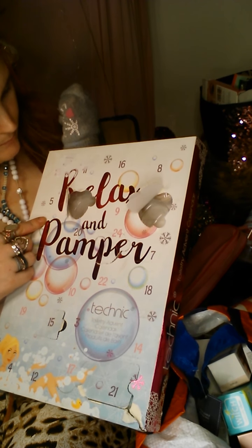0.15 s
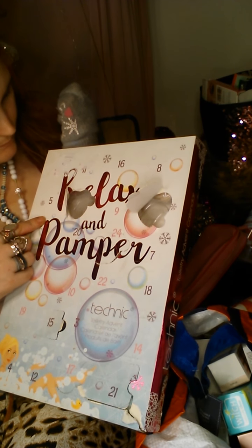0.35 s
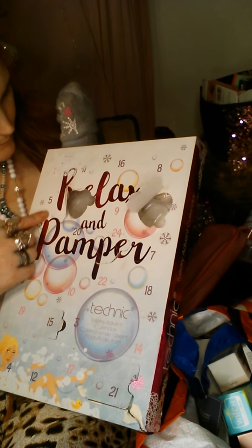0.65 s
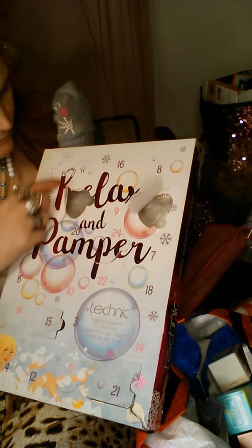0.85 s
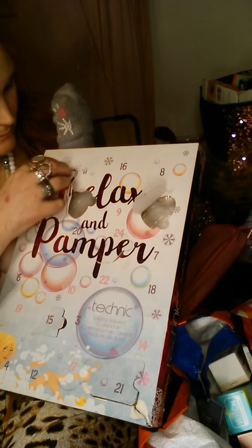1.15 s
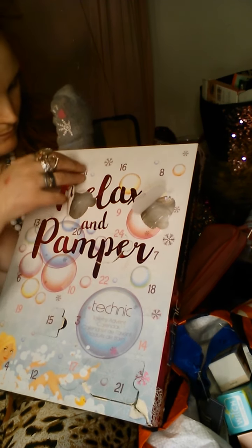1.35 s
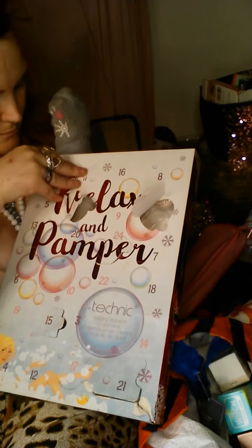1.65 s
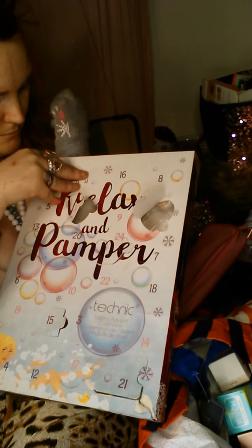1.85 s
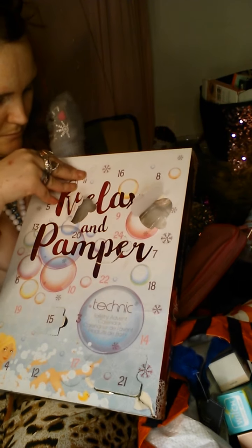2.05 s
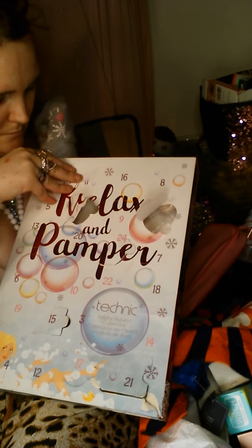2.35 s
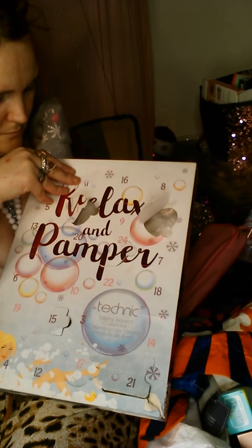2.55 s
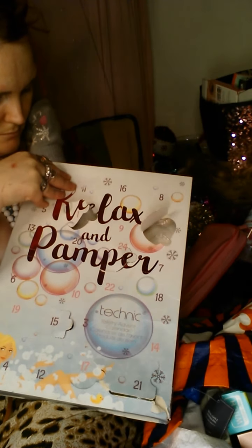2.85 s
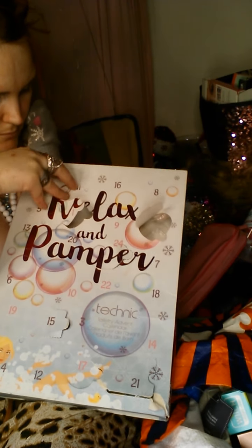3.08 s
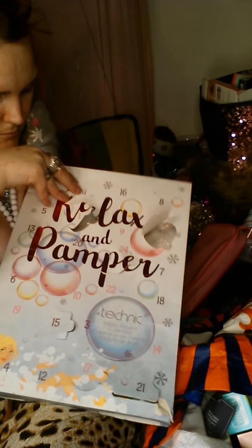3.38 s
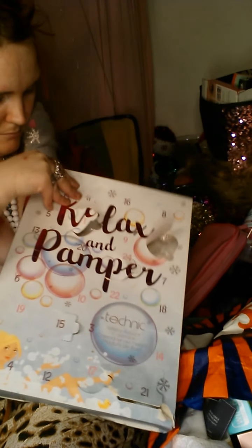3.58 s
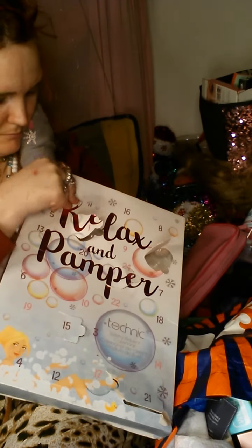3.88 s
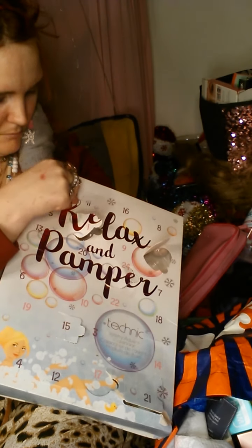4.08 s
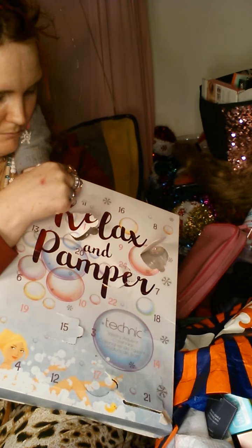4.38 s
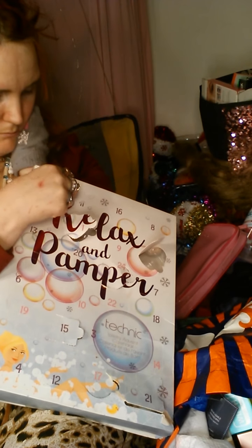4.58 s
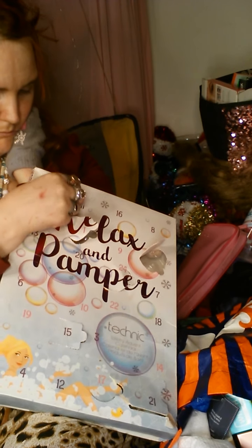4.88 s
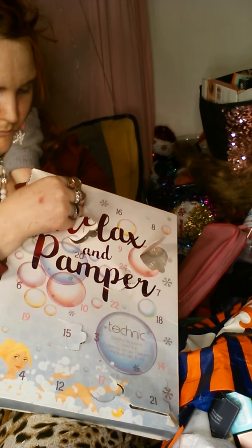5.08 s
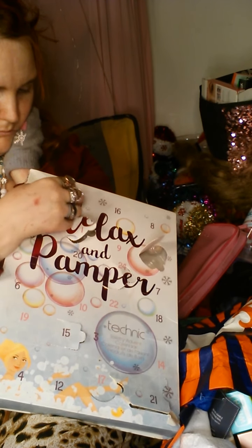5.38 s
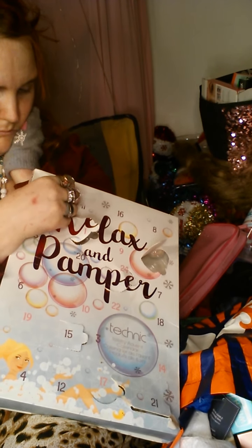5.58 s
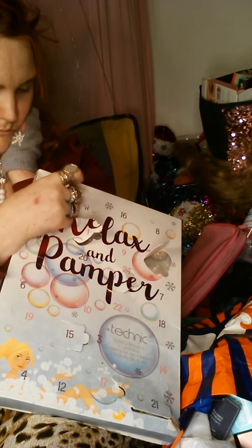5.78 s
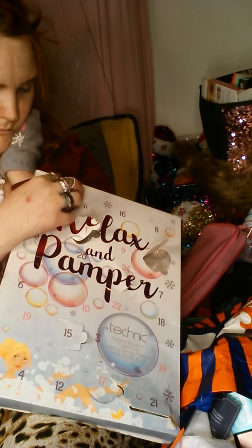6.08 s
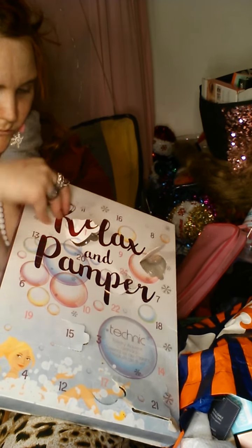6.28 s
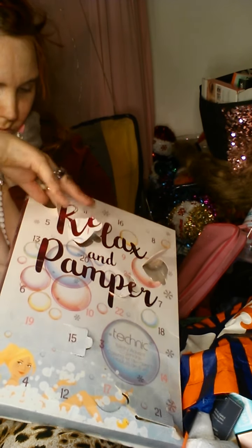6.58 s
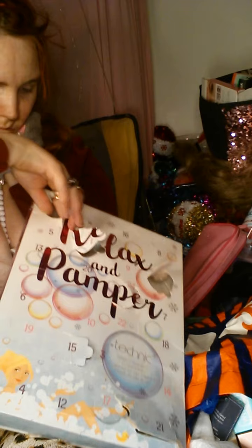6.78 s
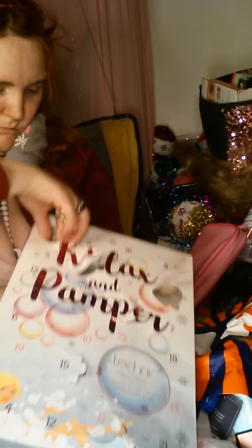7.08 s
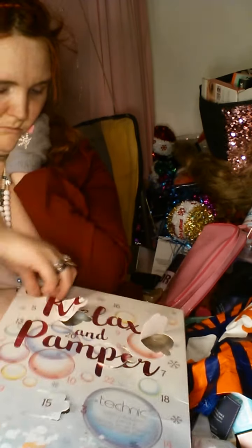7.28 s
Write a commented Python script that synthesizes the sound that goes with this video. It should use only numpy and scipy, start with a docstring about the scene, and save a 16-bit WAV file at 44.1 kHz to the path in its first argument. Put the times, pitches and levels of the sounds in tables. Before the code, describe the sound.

A quiet, small furnished room, captured very close by a phone, with faint low rumble and hiss. For about 0.7 seconds almost nothing is heard; then skin glides softly over glossy card, with dull fingertip bumps from 1.1 to 1.4. From 1.5 nails catch and the rubbing turns gritty. Snaps multiply from 1.9, with fibres tearing around 2.2 to 2.4 and a strong crack and rip at 2.5. More hollow knocks cluster near 2.8, then lighter rustling and ticks. Sharp cracks with a short rip hit at 3.75, another at 4.17. Activity thins from 4.5 to 6, broken by bright snaps at 5.1 and 5.2 amid soft scraping. From 6.5 the sliding grows louder and rougher, snaps crowd together around 7, a tearing run rises near 7.15, and heavy cracks, a rip and low box thumps crowd around 7.3 to 7.4.

```python
"""Stick-slip friction and fracture on a cardboard box

Fingers pry open a perforated door of a cardboard box calendar, close to a phone in a small furnished room.
Skin and sleeve slide over the card: filtered noise, first smooth, then broken into stick-slip catches.
Perforations, creases and fibres snap: brief noise bursts ring the card edge, the panel and the hollow box.
Padded knocks and creaks are bursts around a pitch each; decaying reflections and a faint hiss surround all.
"""
import sys
import numpy as np
from scipy import signal
from scipy.fft import rfft, irfft
from scipy.io import wavfile

SR = 44100
rng = np.random.default_rng(int(sys.argv[2]) if len(sys.argv) > 2 else 0)


def master_out(mix):
    """Clip the mix to full scale and print it as 16-bit PCM to the path in sys.argv[1]."""
    frames = np.transpose(np.atleast_2d(mix))
    ceiling = np.clip(frames, -1, 1)
    pcm = np.round(ceiling * 32767).astype(np.int16)
    wavfile.write(sys.argv[1], SR, pcm)


N = 328104
TIME = np.arange(N) / SR

# Event levels below are taken before the gains of each source, the room and the two ports.
# Strokes of skin, nail or sleeve along the card: start_s, length_s, surface_hiss_db, panel_scrape_db
STROKES = [(0.068, 0.12, -86, -82.5), (0.758, 0.28, -57, -72), (0.84, .18, -51.5, -63.5),
           (1.186, 0.11, -48, -55), (1.37, 0.02, -38.5, -49), (1.478, 0.016, -48.5, -53.5),
           (1.714, 0.029, -44, -47), (1.82, 0.12, -48.5, -50.5), (2.005, 0.029, -42, -47),
           (2.134, 0.14, -45.5, -47), (2.331, 0.12, -45, -40.5), (2.727, 0.14, -43, -48.5),
           (2.951, 0.02, -42.5, -48), (3.058, 0.16, -47, -48.5), (3.403, 0.1, -43.5, -46),
           (3.455, .025, -39, -54), (3.556, 0.17, -56.5, -49.5), (3.687, 0.053, -37, -36),
           (3.958, 0.089, -36.5, -46.5), (4.082, 0.16, -44, -74), (4.293, 0.054, -39.5, -57),
           (4.488, 0.023, -42.5, -52), (4.779, 0.061, -44, -50), (5.026, 0.29, -50.5, -52.5),
           (5.498, 0.02, -54, -60), (5.642, 0.06, -49, -54), (5.692, 0.038, -44.5, -51.5),
           (5.791, 0.029, -44.5, -60), (5.887, 0.022, -49.5, -52.5), (6.041, 0.012, -40.5, -49.5),
           (6.2, 0.3, -49, -55), (6.445, 0.016, -40, -51), (6.54, 0.44, -43, -44.5),
           (6.62, 0.018, -35.5, -36.5), (6.759, 0.14, -34, -47.5), (6.993, 0.47, -36, -43),
           (7.112, 0.085, -31, -42.5), (7.237, 0.15, -36.5, -33.5)]
STROKE_ATTACK_S, STROKE_RELEASE_DB_PER_S = 0.012, 335
# Spells of resting fingers that never keep quite still: start_s, length_s
HOLDS = [(1.003, .42), (1.586, 1.1), (2.63, 0.5), (3.37, 1.23), (4.682, 1.17), (5.998, 1.6)]
HOLD_HISS_DB, HOLD_SCRAPE_DB = -55.5, -56
# Rips, where a stretch of card gives way at once: start_s, length_s, surface_hiss_db, panel_scrape_db
RIPS = [(1.628, 0.0058, -40.5, -38.5), (2.494, 0.016, -28.5, -34), (2.82, .02, -40, -51),
        (3.741, 0.052, -24, -35), (4.172, 0.009, -27.5, -48), (5.204, 0.027, -42, -64),
        (5.42, 0.005, -44.5, -64), (6.228, 0.0076, -36, -62), (7.305, 0.038, -23.5, -29)]
RIP_ATTACK_S, RIP_RELEASE_DB_PER_S = 0.0013, 435
# Bumps and creaks of fingertips on the card and shifts of the box: start_s, level_db, pitch_hz, swell_s
NUDGES = [(0.57, -80, 900, .003), (1.085, -62, 1070, 0.0036), (1.147, -51, 645, 0.0028),
          (1.222, -45.5, 1210, 0.0033), (1.284, -42, 1210, 0.0049), (1.333, -40.5, 1090, 0.007),
          (2.116, -43, 660, 0.0054), (2.64, -41.5, 950, 0.0053), (2.825, -23.5, 1740, 0.001),
          (2.87, -37, 175, 0.0037), (3.01, -47, 666, 0.0036), (3.162, -38.5, 720, 0.0036),
          (3.186, -40, 670, 0.0042), (3.526, -44, 507, 0.011), (3.671, -41, 533, .0025),
          (3.762, -39.5, 150, 0.0075), (3.863, -47, 620, .002), (3.946, -47, 145, 0.0027),
          (4.17, -24.5, 2430, 0.0012), (4.171, -34.5, 427, 0.0021), (5.156, -47, 487, .004),
          (5.246, -50, 400, 0.003), (5.336, -45.5, 517, 0.0045), (5.901, -48.5, 650, 0.0029),
          (6.628, -35.5, 154, 0.0065), (6.638, -33.5, 374, 0.0028), (6.872, -46, 260, 0.012),
          (7.30, -34, 137, 0.0025), (7.355, -34, 163, 0.0024)]
# Snaps of perforations and creases: start_s, edge_tick_db, panel_knock_db
CRACKS = [ (1.542, -49.5, -46.5), (1.629, -38, -38), (1.843, -39.5, -46.5), (1.877, -40, -36.5),
          (1.91, -36.5, -42.5), (1.964, -32, -33.5), (2.09, -39.5, -35.5), (2.151, -31, -41),
          (2.198, -39, -59), (2.217, -28.5, -51), (2.261, -43, -40), (2.324, -33.5, -32.5),
          (2.339, -26, -44), (2.39, -26.5, -31), (2.415, -41, -38.5), (2.492, -18, -19.5),
          (2.734, -37.5, -26), (2.775, -40, -33.5), (2.79, -36, -35), (2.816, -27.5, -23.5),
          (2.826, -27.5, -24.5), (2.941, -40, -51), (3.098, -36, -42.5), (3.214, -40, -39.5),
          (3.319, -50, -41), (3.341, -37.5, -47), (3.375, -28, -33.5), (3.435, -37, -44.5),
          (3.485, -42, -31.5), (3.737, -18, -21.5), (3.773, -35, -26), (3.792, -21, -27), (3.882, -38, -52),
          (3.929, -39.5, -44), (3.974, -27.5, -52), (4.032, -28.5, -39.5), (4.17, -25, -28),
          (4.297, -35, -46.5), (4.403, -54, -47.5), (4.469, -41, -39.5), (4.484, -35, -38.5),
          (4.503, -40, -64), (4.579, -32.5, -38.5), (5.045, -33, -41), (5.096, -22.5, -40.5),
          (5.143, -36.5, -44.5), (5.186, -41, -67), (5.202, -18.5, -65), (5.249, -37.5, -49),
          (5.423, -38.5, -41), (5.624, -46.5, -62), (6.125, -63, -40.5), (6.187, -40, -39.5),
          (6.202, -32, -44), (6.227, -35, -37.5), (6.283, -44.5, -46.5), (6.422, -40, -44.5),
          (6.436, -36, -41.5), (6.544, -24.5, -30), (6.576, -29.5, -67), (6.699, -25.5, -55),
          (6.778, -21.5, -42), (6.891, -30.5, -36.5), (6.933, -31.5, -41), (6.979, -26.5, -42),
          (7.001, -27, -51), (7.024, -21, -28.5), (7.042, -20.5, -58), (7.067, -31, -36.5),
          (7.095, -24, -35.5), (7.274, -24, -23.5), (7.311, -20.5, -29.5), (7.343, -25, -20.5),
          (7.354, -31, -22), (7.374, -25.5, -54), (7.395, -49, -27)]
# Around each crack the card strains and then slides free; levels are relative to the crack
STRAIN_S, SLIDE_S, SLIDE_RELEASE_DB_PER_S = 0.012, 0.018, 398
SLIDE_HISS_DB, SLIDE_SCRAPE_DB = -15, -12.5
# Tearing runs, where fibres give way one after another: start_s, end_s, first_level_db, last_level_db
RUNS = [(2.192, 2.311, -45, -40), (2.326, 2.436, -37, -34.5), (2.622, 2.654, -61, -58),
        (2.837, 2.858, -56, -42), (7.142, 7.207, -55, -32)]

# Spectrum of the faint room rumble and hiss: frequency_hz, relative_level_db
FLOOR_SPECTRUM = [(25, -11), (60, -2), (120, -2.5), (220, -11), (600, -17.5), (4400, -24), (7300, -20),
                  (15000, -27)]
FLOOR_DB = -79.5  # rms before the two ports
# Spectrum of the card's hiss as the microphone hears it, with its resonance near 7.3 kHz:
# frequency_hz, relative_level_db
HISS_SPECTRUM = [(700, -11), (2000, -7.5), (3200, -6.5), (5000, -1.5), (6200, -0.5), (7000, 7.5), (7800, 4),
                 (8800, -2.5), (11000, -13), (14500, -30)]
# Spectrum of scraping carried by the panel: frequency_hz, relative_level_db
SCRAPE_SPECTRUM = [(25, -38), (50, -6), (85, 1), (150, 1), (280, 5), (400, 3), (650, 2), (1200, 3),
                   (1700, -0.5), (2400, 1.5), (4000, -3), (8000, -57)]
# Spectrum of fine hiss of skin on the glossy print: frequency_hz, relative_level_db
SKIN_SPECTRUM = [(2000, -31), (6000, -7), (8000, -0.5), (11000, -1.5), (14500, -6.5)]
# Spectrum of the edge's tick as the microphone hears it, with its resonance near 7.4 kHz:
# frequency_hz, relative_level_db
EDGE_SPECTRUM = [(60, -20), (700, -27), (1800, -7), (3000, -6.5), (5000, 3.5), (6300, 5), (7400, 12),
                 (8600, -1.5), (11000, -10), (14500, -23.5)]
# Spectrum of the knock of the panel: frequency_hz, relative_level_db
PANEL_SPECTRUM = [(30, -34), (100, -24), (250, -9.5), (420, -12.5), (620, -2.5), (900, -3.5), (1250, 1.5),
                  (1650, 1.5), (2100, 2), (2700, -3), (4000, -6.5), (8000, -51)]
# Spectrum of snapping fibres: frequency_hz, relative_level_db
FIBRE_SPECTRUM = [(60, -60), (300, -7.5), (700, -1), (1200, -0.5), (1750, 0), (2500, -27), (4000, -9),
                  (7400, -7), (12000, -34)]
# Flexing modes of the box: frequency_hz, width_hz, lift_db
BOX_MODES = [(139, 25, 4), (252, 30, 1.5), (380, 50, 2), (473, 40, 1.5), (873, 70, 1.5), (1392, 60, 1.5),
             (1608, 70, 2)]

# The nails take hold between these times; before that only a share of the grain is heard
GRIP_FROM_S, GRIP_FULL_S, GLIDE_GRAIN = 1.07, 2.15, 0.089
CEILING, TOP_HZ = 0.92, 14700  # limit of the soft clipping; upper band edge


def undb(db):
    """Level as amplitude: 20 dB is a factor of ten."""
    return 10 ** (np.asarray(db) / 20)


def unit(x):
    """Normalisation to rms 1."""
    return x / np.sqrt(np.mean(x ** 2))


def add(track, sound, s):
    """Superposition: a sound is summed into a track from a given second."""
    start = int(s * SR)
    track[:, start:start + sound.shape[1]] += sound[:, :N - start]


def response(points, modes=(), size=4096):
    """Minimum phase: a spectrum with resonances becomes a causal impulse response of energy 1."""
    hz = np.maximum(np.fft.rfftfreq(size, 1 / SR), 1)
    at, level = np.transpose(points)
    db = np.interp(np.log(hz), np.log(at), level)
    for centre, width, lift in modes:
        db = db + lift / (1 + (2 * (hz - centre) / width) ** 2)
    # Folding the cepstrum onto positive times makes the response causal
    cepstrum = irfft(np.log(undb(db)))
    cepstrum[1:size // 2] *= 2
    cepstrum[size // 2 + 1:] = 0
    h = irfft(np.exp(rfft(cepstrum)))[:size // 2]
    return h / np.linalg.norm(h)


def ring(x, h):
    """Linear convolution: two channels excite an impulse response."""
    return signal.oaconvolve(x, np.atleast_2d(h), axes=1)[:, :x.shape[1]]


def walk(rate):
    """Slow fluctuation: random values, rate per second, joined by straight lines; spread near 1."""
    steps = rng.standard_normal(4096)
    return np.interp(TIME * rate, np.arange(len(steps)), steps)


def flap_modes(count=3):
    """Flap resonance depends on where it is held: random modes of frequency_hz, width_hz, lift_db."""
    mode_hz = 420 * 4.5 ** rng.random(count)
    return [(hz, hz / 4, 4.5) for hz in mode_hz]


def shifting(x, responses, rate):
    """Constant-power cross-fading between responses as the hand moves."""
    weights = np.array([np.exp(1.5 * walk(rate)) for _ in responses])
    weights /= np.linalg.norm(weights, axis=0)
    return sum(ring(part * weight, h) for part, weight, h in zip(x, weights, responses))


def background():
    """Stationary noise: faint rumble and hiss of fixed spectrum."""
    noise = rng.standard_normal((2, N))
    return undb(FLOOR_DB) * unit(ring(noise, response(FLOOR_SPECTRUM)))


def friction(moves, attack_s, release_db_per_s):
    """Addition of power: the hiss and scrape of each move swell, hold and decay exponentially."""
    power = np.zeros((2, N))  # rows: hiss, scrape
    for start, length, hiss_db, scrape_db in moves:
        lead_s = min(10 * attack_s, start)  # the swell begins ahead of the start
        age = np.arange(int((length + .5) * SR)) / SR - lead_s
        swell = .5 * (1 + np.tanh(.5 * age / attack_s))
        decay = undb(-release_db_per_s * np.maximum(age - length, 0))
        add(power, np.outer(undb([hiss_db, scrape_db]), swell * decay) ** 2, start - lead_s)
    return power


def sliding():
    """Summed friction power in dB: resting fingers, strokes, rips and the slide around each crack."""
    resting = [(start, length, HOLD_HISS_DB, HOLD_SCRAPE_DB) for start, length in HOLDS]
    freed = [(s, SLIDE_S, edge_db + SLIDE_HISS_DB, panel_db + SLIDE_SCRAPE_DB)
             for s, edge_db, panel_db in CRACKS]
    power = (friction(resting + STROKES, STROKE_ATTACK_S, STROKE_RELEASE_DB_PER_S)
             + friction(RIPS, RIP_ATTACK_S, RIP_RELEASE_DB_PER_S)
             + friction(freed, STRAIN_S, SLIDE_RELEASE_DB_PER_S))
    return 10 * np.log10(power + 1e-12)


def slips(rate, spread_db, length_s):
    """Stick-slip: power of catches at random times, many small and a few large; mean 1."""
    chance = rng.random(N)
    strength = np.minimum(rng.exponential(size=N), 4)
    catches = (chance < rate / SR) * undb(spread_db * strength) ** 2
    # A double pole makes each catch swell and die away
    pole = np.exp(-1 / (length_s * SR))
    power = signal.lfilter([1], [1, -2 * pole, pole ** 2], catches)
    return power / power.mean()


def force(db, grain, catches, flutter_db=1.5):
    """Friction amplitude: steady sliding and stick-slip catches share the power."""
    grip = np.interp(TIME, [GRIP_FROM_S, GRIP_FULL_S], [GLIDE_GRAIN, 1])
    merging = np.interp(db, [-48, -28], [1, .7])  # under a hard pull the catches run together
    share = np.clip(grain * grip * merging, 0, 1)
    return np.sqrt(1 - share + share * catches) * undb(db + flutter_db * walk(45))


def skin(surface_db, light_touch_db=-50, gain_db=-13, growth=.55):
    """Compressive growth: above a light touch the fine top hiss rises more slowly than the rest."""
    pressure_db = surface_db - light_touch_db
    db = light_touch_db + gain_db + np.minimum(pressure_db, growth * pressure_db)
    return ring(undb(db) * rng.standard_normal((2, N)), response(SKIN_SPECTRUM))


def rubbing(hiss_db=-1, scrape_db=-2.5, hiss_grain=0.47, scrape_grain=0.71, count=6):
    """Sliding friction: the hand glides smoothly, then the nails grip and the card catches and crackles."""
    surface_db, board_db = sliding()
    catches = slips(rate=230, spread_db=3.8, length_s=.00035)
    hiss_force = force(surface_db + hiss_db, hiss_grain, catches)
    hiss = ring(hiss_force * rng.standard_normal((2, N)), response(HISS_SPECTRUM))
    # The panel rings differently for each way of holding the flap
    holds = [response(SCRAPE_SPECTRUM, BOX_MODES + flap_modes()) for _ in range(count)]
    scrape_force = force(board_db + scrape_db, scrape_grain, catches)
    drive = scrape_force * rng.standard_normal((count, 2, N))
    return hiss + shifting(drive, holds, rate=25) + skin(surface_db)


def burst(h, length_s, size=3200):
    """Impulsive excitation: noise swells and dies within moments and rings a response; rms 1 over 10 ms."""
    age = np.arange(size) / SR / length_s
    x = ring(rng.standard_normal((2, size)) * age ** 2 * np.exp(-age), h)
    return x / np.sqrt(np.sum(x ** 2, axis=1, keepdims=True) / (.01 * SR))


def nudges(gain_db=-2):
    """Damped impact: short, padded knocks and creaks, each a band of noise around its own pitch."""
    out = np.zeros((2, N))
    for s, db, hz, swell_s in NUDGES:
        knock = response([(hz / 6, -34), (hz / 2, -11), (hz * .8, 0),
                          (hz * 1.2, 0), (hz * 2, -13), (hz * 10, -48)])
        add(out, undb(db + gain_db) * burst(knock, swell_s), s)
    return out


def cracks(edge_s=0.00064, panel_s=0.001, edge_gain_db=-1, panel_gain_db=-1):
    """Brittle fracture: each crack is a sharp tick of the edge and a slower knock of the panel."""
    out = np.zeros((2, N))
    edge = response(EDGE_SPECTRUM)
    onset_s = .3 / 343  # short delay before each crack sounds
    for s, edge_db, panel_db in CRACKS:
        panel = response(PANEL_SPECTRUM, BOX_MODES + flap_modes())
        tick = undb(edge_db + edge_gain_db) * burst(edge, edge_s)
        knock = undb(panel_db + panel_gain_db) * burst(panel, panel_s)
        add(out, tick + knock, s + onset_s)
    return out


def tearing(rate=115, snap_s=0.00048, scatter_db=3, gain_db=-1):
    """Progressive fracture: a loosely regular train of small snaps runs along the perforation."""
    out = np.zeros((2, N))
    for start, end, first_db, last_db in RUNS:
        s = start
        while s < end:
            db = np.interp(s, [start, end], [first_db, last_db]) + scatter_db * rng.standard_normal()
            fibre = response(FIBRE_SPECTRUM, flap_modes())
            add(out, undb(db + gain_db) * burst(fibre, snap_s), s)
            s += rng.uniform(.6, 1.4) / rate
    return out


def echoes(db, t60, gap_s, size, count):
    """Diffuse reverberation: noise responses build up over gap_s and fall 60 dB in t60 seconds."""
    age = np.arange(size) / SR
    decay = undb(-60 * age / t60) * np.minimum(age / gap_s, 1) ** 2
    return undb(db) * decay / np.linalg.norm(decay) * rng.standard_normal((count, 2, size))


def room(x):
    """Reflection: quick, changing echoes from box, hands and body, and a furnished room's short tail."""
    near = echoes(db=-8, t60=.035, gap_s=.002, size=2000, count=10)
    walls = echoes(db=-10.5, t60=0.21, gap_s=0.0066, size=13000, count=3)
    near_sound = shifting([x] * len(near), near, rate=12)
    wall_sound = shifting([x] * len(walls), walls, rate=3)
    return x + near_sound + wall_sound


def ports(x, apart_hz=1700, bass_side=0.24):
    """Spatial coherence: two close ports share the bass and differ in the treble (mid, side to left, right)."""
    mid, side = x
    highpass = signal.butter(1, apart_hz, "high", fs=SR, output="sos")
    treble = signal.sosfilt(highpass, side)
    side = treble + bass_side * (side - treble)
    return np.array([mid + side, mid - side])


def scene():
    """Superposition: the handled box in its room, over a faint steady hiss."""
    box = rubbing() + nudges() + cracks() + tearing()
    return ports(room(box) + background())


def record(dry):
    """Saturation and band limiting: the phone rounds the highest peaks and cuts the top."""
    rounded = CEILING * np.tanh(dry / CEILING)
    lowpass = signal.ellip(8, .2, 70, TOP_HZ, fs=SR, output="sos")
    return signal.sosfilt(lowpass, rounded)


dry = scene()
out = record(dry)
master_out(out)
```